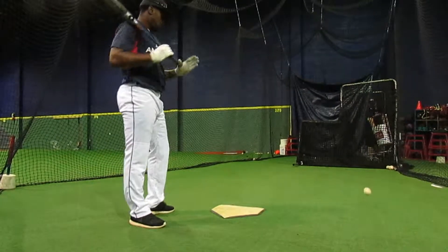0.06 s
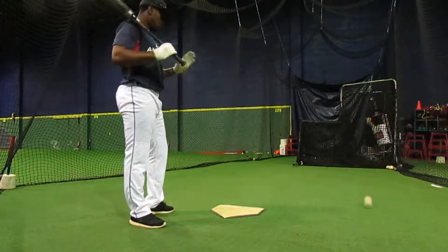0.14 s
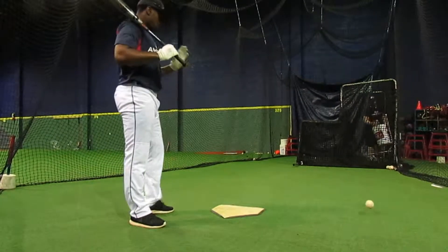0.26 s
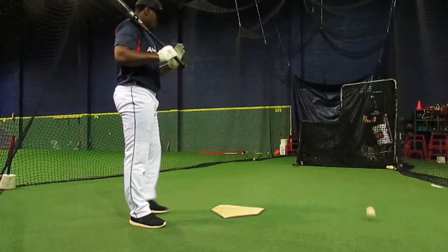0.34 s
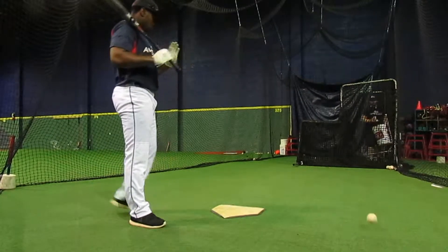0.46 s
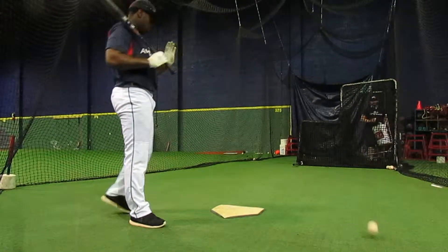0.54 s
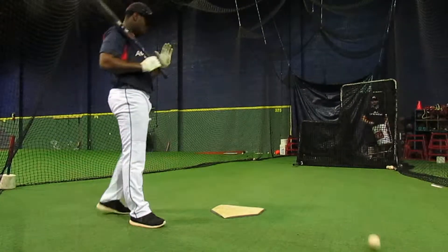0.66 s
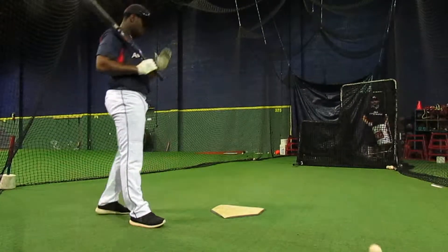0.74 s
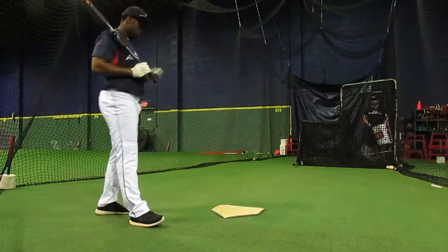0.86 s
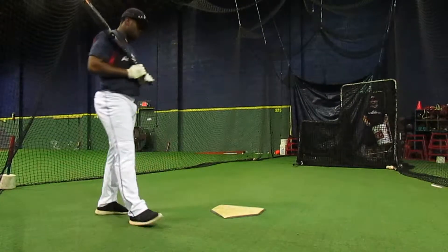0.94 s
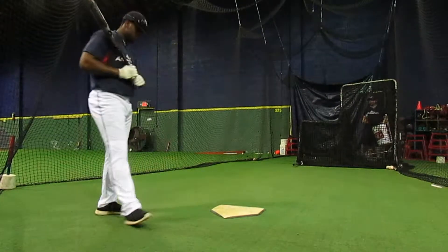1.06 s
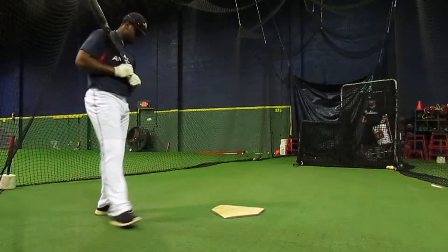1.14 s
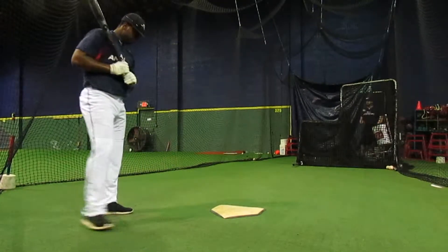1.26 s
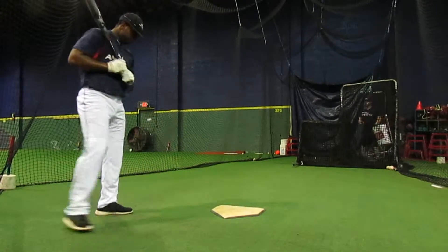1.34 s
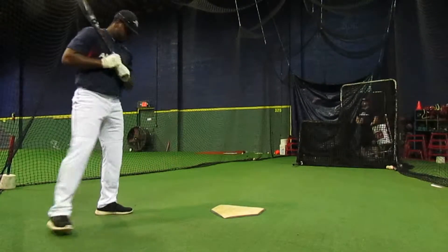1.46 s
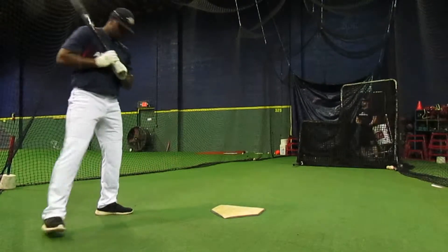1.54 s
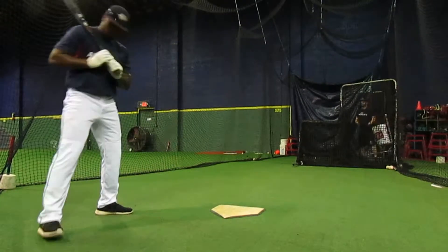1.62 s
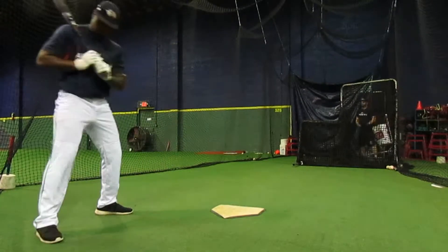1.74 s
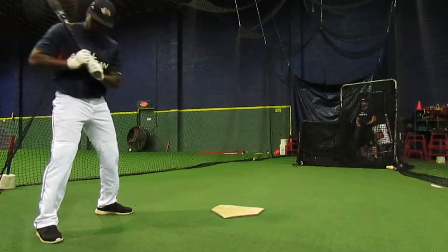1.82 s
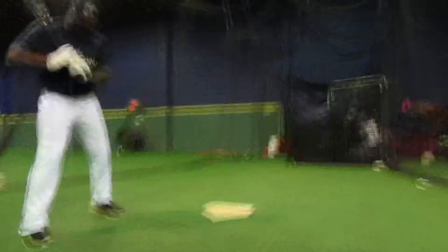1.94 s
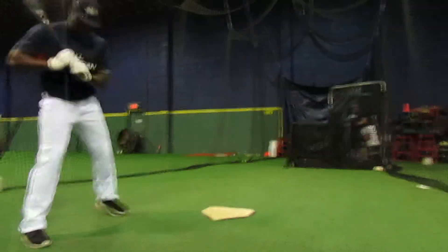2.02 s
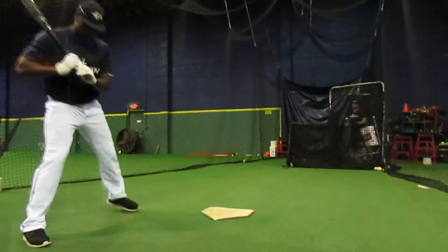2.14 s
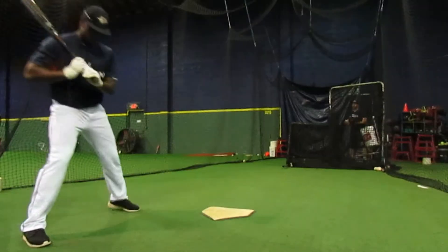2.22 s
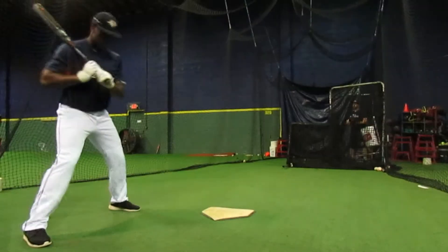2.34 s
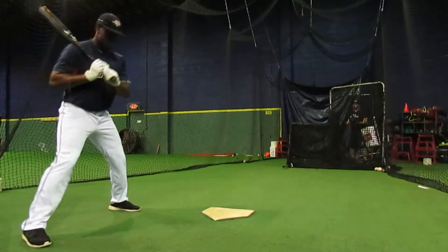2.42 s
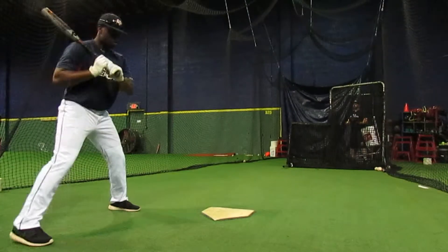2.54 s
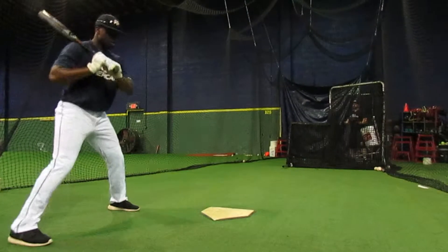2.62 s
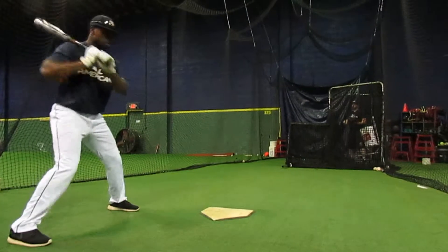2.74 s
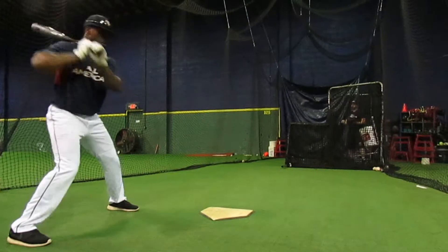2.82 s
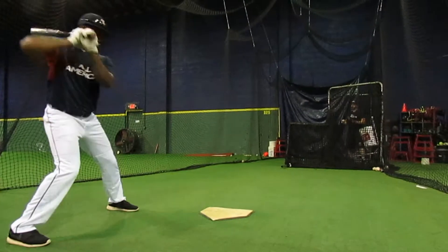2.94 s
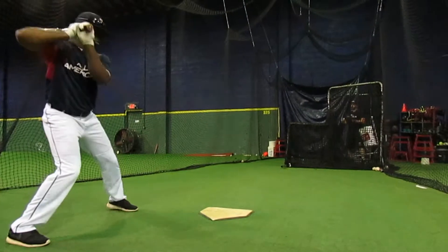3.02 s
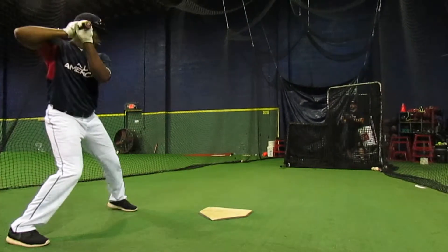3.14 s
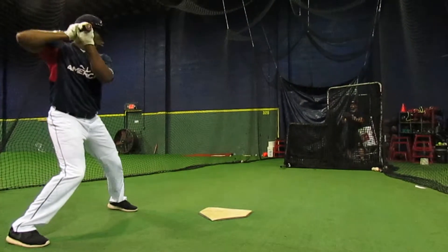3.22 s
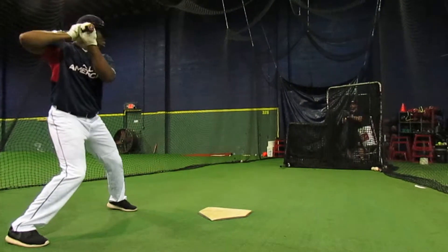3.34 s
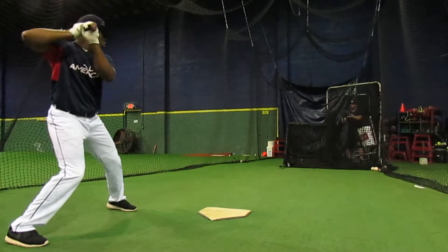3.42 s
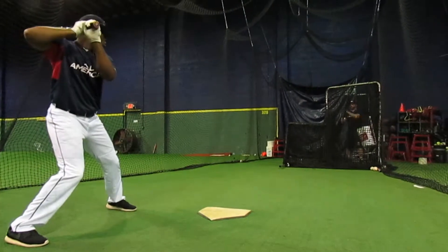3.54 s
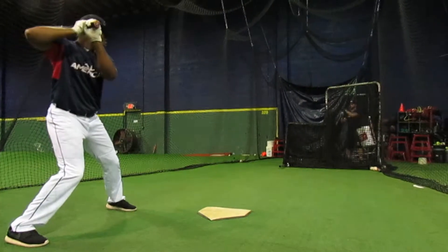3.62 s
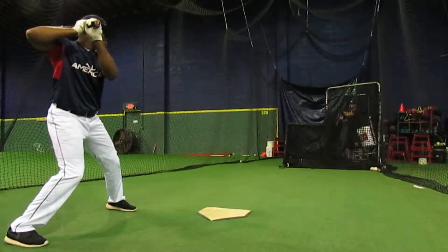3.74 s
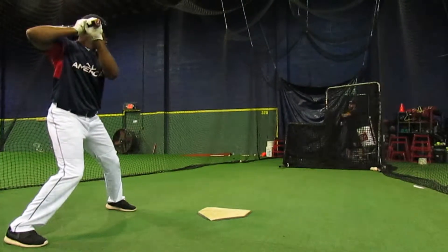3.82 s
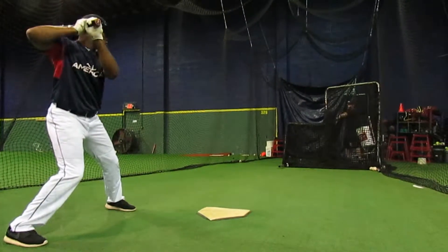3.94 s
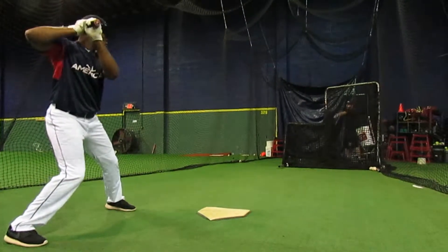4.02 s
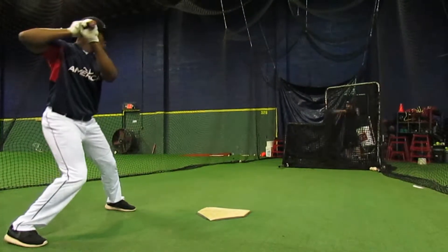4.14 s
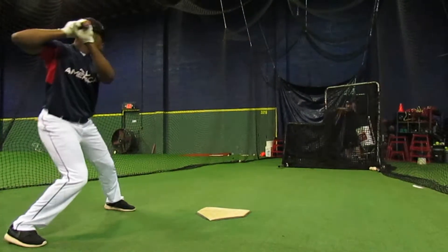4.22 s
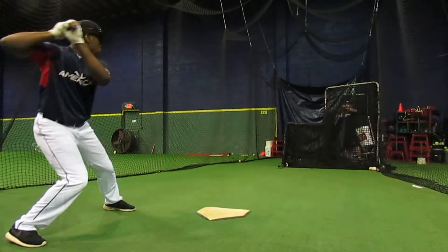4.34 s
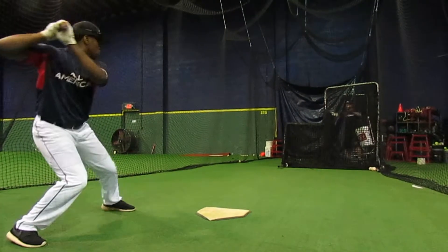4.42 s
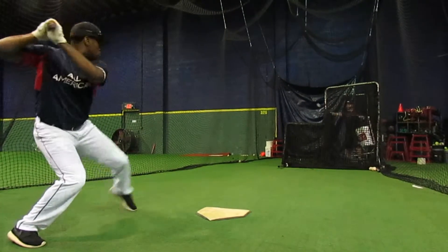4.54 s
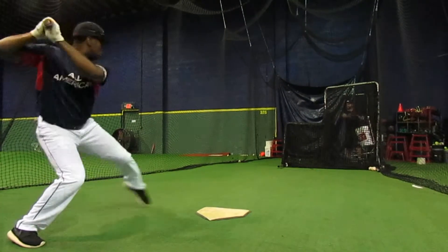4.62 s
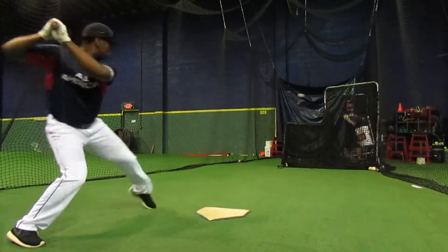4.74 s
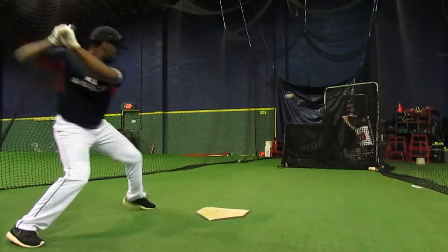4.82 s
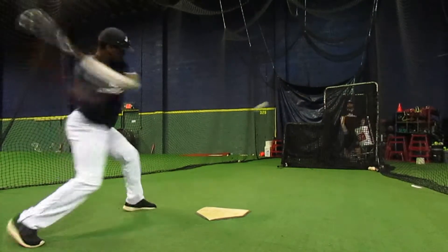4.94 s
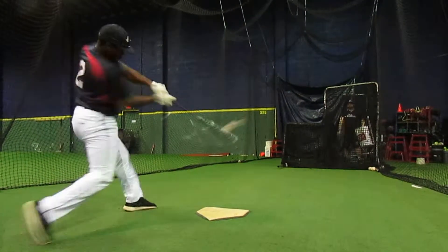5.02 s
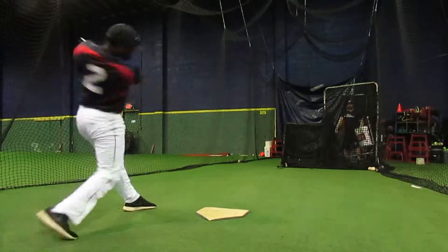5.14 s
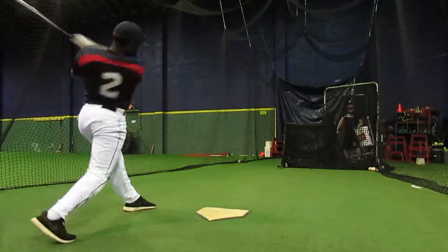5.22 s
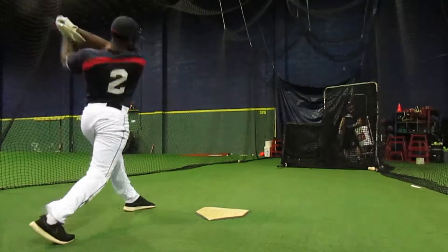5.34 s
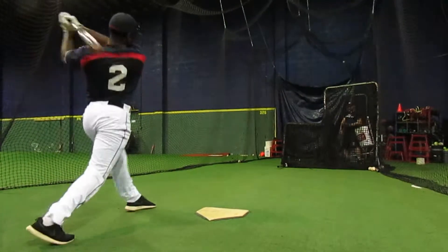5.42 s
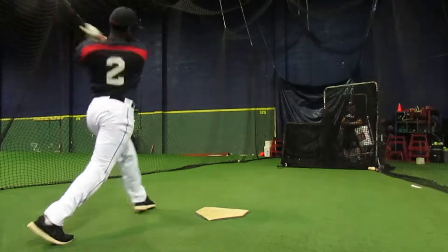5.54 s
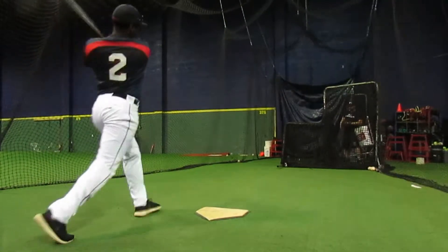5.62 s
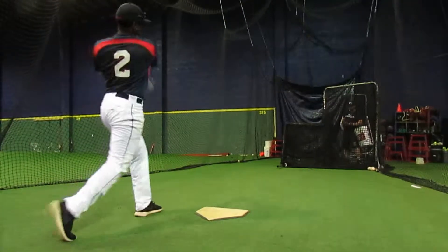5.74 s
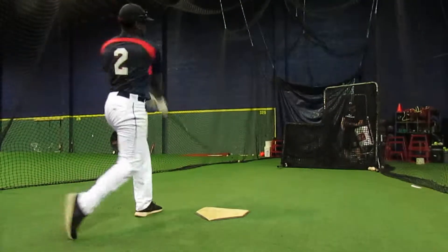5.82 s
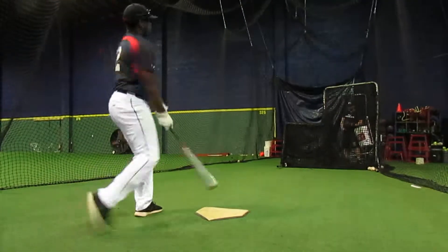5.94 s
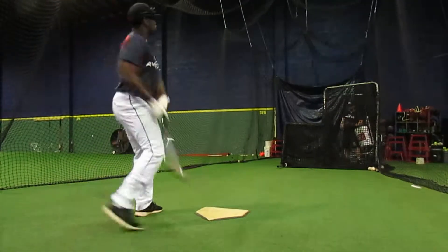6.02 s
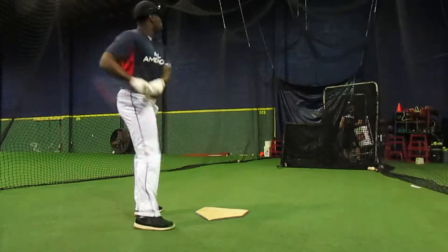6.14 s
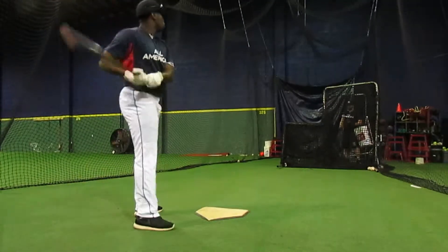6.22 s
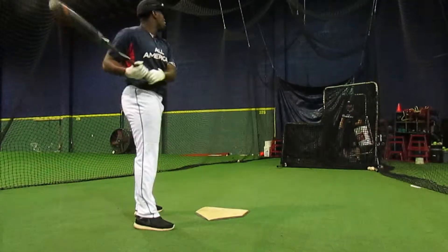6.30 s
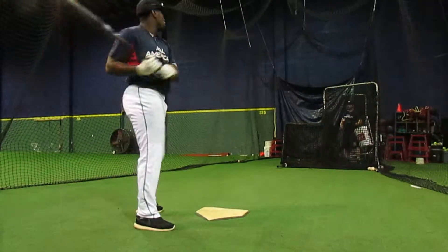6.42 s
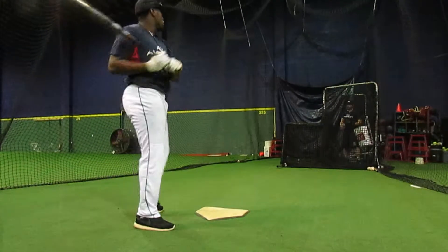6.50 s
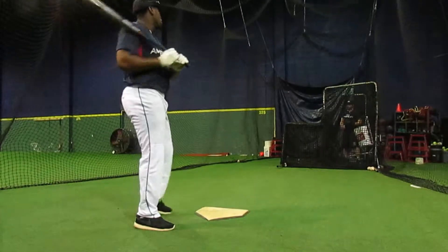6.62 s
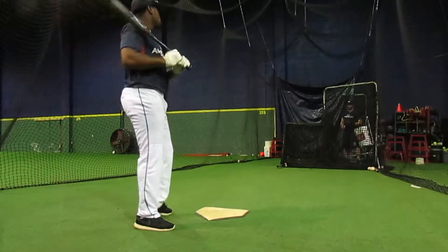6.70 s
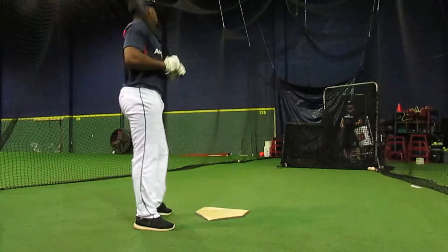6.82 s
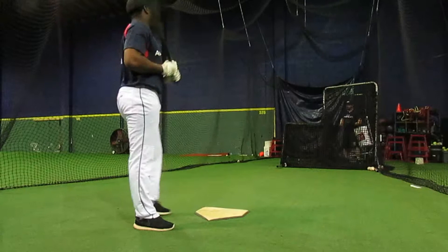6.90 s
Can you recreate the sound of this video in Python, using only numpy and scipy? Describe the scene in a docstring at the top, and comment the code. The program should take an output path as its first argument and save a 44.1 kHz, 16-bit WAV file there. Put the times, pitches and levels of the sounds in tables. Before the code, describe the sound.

Inside a large, hard-walled batting hall, mains hum and soft ventilation run throughout. A ball rolls closer and jolts a nearby stand with a hollow knock and brief rattle. Shoes and clothes rustle faintly through a quiet wait. A bat swishes and cracks a ball very loudly; the hall rings, the background dips, and a quick group of dull thuds follows. Stereo microphones stand close to the floor action.

```python
"""Indoor batting practice

A stray ball rolls up and jolts the stand; a batter's shoes and clothes rustle, the bat swishes and
cracks a ball into the netting, the hall rings, and a thud echoes closely over hum and ventilation.
Impacts are damped modes and noise bursts, the hall is noise fading band by band, movement is shaped
noise, the hum is wavering sines. Gain control ducks after loud hits and recovers; peaks may clip."""
import sys
import numpy as np
from scipy import signal
from scipy.fft import rfft, irfft, next_fast_len
from scipy.io import wavfile
from scipy.ndimage import uniform_filter1d

SR = 44100
rng = np.random.default_rng(int(sys.argv[2]) if len(sys.argv) > 2 else 0)


def wav_record(signal):
    """Record a signal, one row per channel, as 16-bit PCM in the file named by sys.argv[1]."""
    frames = np.transpose(np.atleast_2d(signal))
    bounded = np.clip(frames, -1, 1)
    # unit amplitude maps onto the largest positive 16-bit level
    quanta = np.round(bounded * 32767).astype(np.int16)
    wavfile.write(sys.argv[1], SR, quanta)


N = 307377
TIME = np.arange(N) / SR  # seconds

# Spectrum tables give relative colour; noise() sets the rms level.
# bat and ball modes: pitch_hz, level_db, t60_s
BAT_MODES = [(942,6,0.0096),(1674,5,0.012),(1980,2,.007),(2931,-1.5,.042),(3334,-13,0.094),(4234,-2.5,0.0089),(4940,-5.5,0.012),(6070,-12,.01),(6520,-18.5,0.011),(10600,-9,0.0061)]
# low shove of air at contact: pitch_hz, level_db, t60_s
AIR_PUSH = [(70,-25,.025)]
# instant of contact, spectrum: freq_hz, density_db (per Hz)
SNAP_SPECTRUM = [(300,-16.5),(2000,3.5),(8000,-3),(15000,-3.5)]
# the crack as the hall returns it, spectrum: freq_hz, density_db (per Hz)
CRACK_HALL_SPECTRUM = [(47, -36.5), (80, -17), (138, -18.5), (273, -5.5), (371, -11), (526, 0), (600, -4.5),
                       (780, 0.5), (1290, -1), (1540, 2.5), (2550, -7), (3030, -3), (3940, -13),
                       (6970, -17), (15000, -40.5)]
# the bat's ring in the hall, spectrum: freq_hz, density_db (per Hz)
PING_SPECTRUM = [(2500,-42.5),(2830,-14),(2960,-3),(3130,-6),(3330,-3.5),(3520,-5),(3900,-48)]
# bright early reflections, spectrum: freq_hz, density_db (per Hz)
SIZZLE_SPECTRUM = [(2000,-22),(5000,1),(9000,1),(15000,-16.5)]
# hall decay before each layer's t60_share: freq_hz, t60_s
HALL_DECAY = [(120,4),(300,4.26),(700,3.22),(1500,2.63),(3100,2.09),(5000,1.7),(8000,1.23),(14000,1)]
# distinct wall echoes of the crack: start_s, level_db
WALL_ECHOES = [(5.0884,-8.5),(5.1418,-11.5),(5.167,-40),(5.297,-18.5)]
# colour of those echoes: freq_hz, density_db (per Hz)
ECHO_SPECTRUM = [(100,-27),(250,3),(500,-7.5),(900,5),(1700,-1),(2600,-16),(6000,-20.5),(15000,-37)]
# small metal net fittings: pitch_hz, level_db, t60_s
FITTING_MODES = [(6982,-3.5,0.71),(9570,-1.5,0.49),(11165,-8.5,0.55),(12452,3.5,0.36),(13426,-1,0.35)]
CONTACT_S = 5.0429  # the bat meets the ball

# thuds of a ball and their close echoes: start_s, direct_db, pitch_factor, hall_db, slap_db
BALL_THUDS = [(0.612,-30.5,0.52,-47,-56),(6.2642,-9.5,0.91,-27,-42),(6.2895,-11,1.23,-35.5,-23.5),(6.3332,-13.5,1.01,-39,-57),(6.433,-23,0.95,-54,-66.5)]
# thud modes before pitch_factor: pitch_hz, level_db, t60_s
THUD_MODES = [(190,-18,0.079),(347,-11,0.0042),(565,-1,0.018),(865,-32,0.0042)]
# dull noise of a thud, spectrum: freq_hz, density_db (per Hz)
THUD_SPECTRUM = [(29, -51), (50, -22), (221, -2.5), (330, -5), (397, 0.5), (427, -1), (663, -0.5),
                 (1030, -15), (1720, -25.5), (2480, -34), (4000, -31), (5200, -58), (8800, -120)]
# slap and netting, spectrum: freq_hz, density_db (per Hz)
SLAP_SPECTRUM = [(150,-13.5),(700,12),(1600,7.5),(2500,-13),(3600,-9),(6000,-12.5),(11000,-17.5),(15000,-31.5)]
# netting rustle after the stray ball lands: peak_s, level_db, rise_s, hold_s, fall_s
NET_RUSTLE = (.635,-51.5,.08,.05,1.0)

# soles twisting on the turf: peak_s, level_db, rise_s
SOLE_TWISTS = [(4.941,-32.5,.07),(4.996,-39,.14)]
# stick-slip partials of a sole: multiple (of the slip rate), level_db
SOLE_PARTIALS = [(1,-7),(2,-1),(3,-9),(4,-22.5)]
# slip rate at the twist's peak, and the share of it lost each second
SLIP_HZ, SLIP_SAG_PER_S, TWIST_FALL_S = 196.5, .8, 0.07
# swish of the bat, greatest at contact
SWING_DB, SWING_RISE_S, SWING_FALL_S = -34.5, 0.2, 0.041
# air rushing round the bat, spectrum: freq_hz, density_db (per Hz)
SWISH_SPECTRUM = [(80,-17),(220,-2.5),(600,-1.5),(1400,-3.5),(2500,-15.5),(7000,-27.5),(15000,-31)]
# a shoe dragged over the turf: peak_s, level_db, rise_s, hold_s, fall_s
SHOE_DRAG = (1.262,-43.5,.33,.085,.62)
# shoe on turf, spectrum: freq_hz, density_db (per Hz)
TURF_SPECTRUM = [(100,-27),(230,-3),(550,6.5),(800,-11),(1500,-6.5),(2400,-24),(3400,-9.5),(4400,-21),(5800,-13.5),(6800,-10.5),(8000,-15.5),(11000,-16.5),(15500,-20)]
# low rumbles, weight on the floor and the hall's rumble after the crack:
# peak_s, level_db, rise_s, hold_s, fall_s
LOW_RUMBLES = [(.03,-59.5,1.0,0.11,1.3),(2.407,-55,1.5,.04,.8),(3.3,-65,0.89,.12,1.1),(4.5,-73.5,1.5,.3,1.0),(5.451,-48,1.4,0.68,3.2)]
# clothes and gloves rustling: peak_s, level_db, rise_s, hold_s, fall_s
CLOTHES_RUSTLES = [(0.023,-60.5,1.1,0.15,1.3),(3.3,-66,1.34,.12,1.0),(4.422,-59.5,1.0,.1,1.2),(4.93,-50,0.38,.005,.28),(5.04,-37,0.16,0.29,2.5),(5.83,-48,0.276,0.055,.6),(5.953,-39.5,.12,.01,1.1),(6.308,-45,0.39,.01,0.44),(6.602,-50,0.26,0.0097,.4)]
# clothes, spectrum: freq_hz, density_db (per Hz)
SCUFF_SPECTRUM = [(100,-30.5),(250,4),(550,-3.5),(1500,-10),(2400,-14.5),(3400,-15),(7000,-18),(11000,-25.5),(15500,-39)]

# ball jolting the stand: start_s, level_db, rattle_db
STAND_BUMPS = [(1.9106,-18,-44),(1.9121,-12.5,-19.5),(1.917,-6.5,-18.5),(1.9216,-18.5,-15)]
# stand modes: pitch_hz, level_db, t60_s
STAND_MODES = [(123,-10.5,0.096),(227,1.5,0.051),(359.3,-14,0.21),(511,-9,0.04),(720,-9,0.02),(960,-18,0.052),(1710,-19,0.052)]
# loose parts of the stand, spectrum: freq_hz, density_db (per Hz)
RATTLE_SPECTRUM = [(710, -41), (1200, 4.5), (1650, -5), (4980, -23.5), (5910, -14.5), (9170, -15.5),
                   (9990, -9.5), (11100, -25), (15500, -31)]
# the jolt's short echo from the cage, spectrum: freq_hz, density_db (per Hz)
CAGE_SPECTRUM = [(80,-16),(250,1.5),(420,7),(700,-18),(1700,-15),(3000,-28),(9000,-32.5),(15000,-50)]
# rolling ball and low rumbles, spectrum: freq_hz, density_db (per Hz)
RUMBLE_SPECTRUM = [(15,-34),(30,-19.5),(60,0),(85,3.5),(170,-3.5),(300,-9),(600,-17.5),(1500,-17.5),(4000,-39.5)]
# the ball rolls at a steady speed to the stand, STAND_M from the listening point
ROLL_START_S, ROLL_END_S, ROLL_M_PER_S, STAND_M = 0.59, 1.935, 1.65, 1.6
ROLL_RISE_S, ROLL_T60_S = 0.4, 1.6
ROLL_DB, SEAM_DB = -49.5, -47.5  # levels at the stand, quieter farther off
SEAM_START_S, TURN_S, SEAM_GAP_S = 1.516, .1425, .086  # two seam ticks per turn

# light ticks of shoes and gloves: start_s, level_db
SMALL_TICKS = [(0.1752,-49.5),(0.3872,-51),(.5811,-52),(.8261,-54.5),(0.944,-50.5),(1.1383,-54),(2.2628,-52),(2.5384,-51),(6.567,-47)]
# dry tick, spectrum: freq_hz, density_db (per Hz)
TICK_SPECTRUM = [(500,-22.5),(1800,3),(3200,5.5),(5000,-5),(9000,-15),(15000,-35.5)]
# faint pips: start_s, level_db
FAINT_PIPS = [(1.0886,-50),(1.4092,-46.5),(1.5687,-47.5),(1.6523,-46),(2.3285,-45.5),(2.896,-51.5),(3.049,-47),(3.204,-50.5),(3.6496,-46.5),(3.8895,-48),(4.0522,-53),(4.4922,-49)]
# modes of a pip: pitch_hz, level_db, t60_s
PIP_MODES = [(1677,-0.5,0.035),(1633,-12,0.027)]

# mains hum lines before the shared lift: pitch_hz, level_db (rms)
HUM_LINES = [(360.7, -55), (479.1, -62), (597.5, -63.5), (721.4, -62.5), (958.2, -70.5), (1082, -73),
             (1200, -70), (1319, -68), (1443, -73), (1680, -77.5), (1922, -74.5), (2040, -76.5),
             (2159, -80.5), (2283, -82.5), (2998, -77), (3720, -79.5), (4199, -83), (4560, -94),
             (5039, -90), (5459, -82.5), (5518, -81), (5760, -78)]
HUM_LIFT_DB = 2.0
# hum between the microphones: freq_hz, balance_db (left minus right)
HUM_BALANCE = [(60, 0.0), (110, 0.0), (200, 1.5), (380, 1), (700, 0.5), (1290, -6), (2380, 1), (4400, -0.5),
               (8120, -1.5), (15000, -1.5)]
# hum between the microphones: freq_hz, phase_rad (left leads)
HUM_LEAD = [(360,-0.11),(600,-0.53),(1200,-1.95),(1640,0.57),(2580,1),(3600,0.897),(7000,-0.31)]
# ventilation, spectrum: freq_hz, density_db (per Hz)
AIR_SPECTRUM = [(15,-60.5),(35,-38.5),(70,-22.5),(130,-15.5),(260,-11.5),(450,-12.5),(800,-13.5),(1350,-19.5),(1750,-18.5),(2500,-25.5),(4800,-29),(7500,-31),(11000,-33.5),(15500,-41.5)]
AIR_DB = -57.5  # ventilation level, before its slow drift

# diffuse sound at the two microphones: freq_hz, likeness (clipped to -1..1)
MIC_LIKENESS = [(100,6.5),(230,2.5),(400,0.9),(640,0.57),(1400,0.14),(3100,1),(7000,.9),(15000,0.2)]
# diffuse sound at the two microphones: freq_hz, balance_db (left minus right)
MIC_BALANCE = [(60,-3),(110,-1.5),(200,-2.5),(380,4),(700,-2.0),(1290,-9.5),(2380,-3),(4400,-1.0),(8120,-1),(15000,-2)]
# diffuse sound at the two microphones: freq_hz, phase_rad (left leads)
MIC_LEAD = [(100,-0.45),(400,-0.03),(860,-0.5),(1200,-1.5),(1550,-0.055),(2150,1),(4100,0.14),(12000,-0.077)]
EDGE_HZ = 15900  # top of the output band


def crack():
    """The blow sets bat modes ringing and pushes air; hall, walls and net fittings answer."""
    out, s = np.zeros((2, N)), CONTACT_S
    bat = ring(BAT_MODES[1::2]) - ring(BAT_MODES[::2])  # neighbouring modes swing in opposite directions
    add(out, s, low_cut(bat, hz=350) * amp([[-1.5], [2]]))  # louder on the right
    add(out, s, ring(AIR_PUSH))
    add(out, s, amp(8.0) * burst(SNAP_SPECTRUM, t60=0.0036))
    add(out, s, amp(-32.5) * burst(SLAP_SPECTRUM, t60=0.14))  # scatter off turf and netting close by
    add(out, s, amp(-14.5) * hall(CRACK_HALL_SPECTRUM, gap=0.019, rise=0.038, t60_share=1.0))
    add(out, s, amp(-20.5) * hall(PING_SPECTRUM, gap=0.0058, rise=0.044, t60_share=0.89))
    add(out, s, amp(-22.0) * hall(SIZZLE_SPECTRUM, gap=0.021, rise=.015, t60_share=0.35))
    for echo_s, db in WALL_ECHOES:
        add(out, echo_s, amp(db) * burst(ECHO_SPECTRUM, t60=0.065))
    fade_in = np.minimum(TIME[:SR] / .015, 1)
    add(out, 5.495, amp(-45.5) * ring(FITTING_MODES) * fade_in)
    return out


def thuds():
    """Each thud or echo is damped modes and a noisy slap, with a boom in the hall; netting rustles."""
    out = noise(SLAP_SPECTRUM, size=N) * swell(*NET_RUSTLE) * grit(depth_db=3.5)
    for s, db, pitch, hall_db, slap_db in BALL_THUDS:
        modes = [(hz * pitch, mode_db, t60) for hz, mode_db, t60 in THUD_MODES]
        thud = -amp(db) * ring(modes)
        pair = np.array([np.roll(thud, 8), thud])  # left lags by 8 samples
        add(out, s, low_cut(pair, hz=130))
        add(out, s, amp(db - 12) * burst(THUD_SPECTRUM, t60=0.073))
        add(out, s, amp(slap_db) * burst(SLAP_SPECTRUM, t60=0.039))
        add(out, s, amp(hall_db) * hall(THUD_SPECTRUM, gap=0.022, rise=0.0067, t60_share=0.47))
    return out


def batter():
    """A dragged shoe and clothes are shaped, gritty noise; soles stick and slip, and the bat swishes."""
    drag = noise(TURF_SPECTRUM, size=N) * swell(*SHOE_DRAG) * grit(depth_db=1.8)
    rustles = sum(swell(*row) for row in CLOTHES_RUSTLES)
    clothes = noise(SCUFF_SPECTRUM, size=N) * rustles * grit(depth_db=2.0)
    soles = sum(twist(*row) for row in SOLE_TWISTS)
    return drag + clothes + swish() + soles


def swish():
    """Air noise grows as the bat speeds up, then dies quickly after contact."""
    envelope = swell(CONTACT_S, SWING_DB, SWING_RISE_S, 0, SWING_FALL_S)
    return noise(SWISH_SPECTRUM, size=N) * envelope


def twist(s, db, rise):
    """A turning sole sticks and slips at a steadily slowing rate, as a set of harmonics."""
    slip_hz = SLIP_HZ * (1 - SLIP_SAG_PER_S * (TIME - s))
    turns = np.cumsum(slip_hz) / SR
    slips = sum(amp(partial_db) * np.cos(2 * np.pi * round(k) * turns) for k, partial_db in SOLE_PARTIALS)
    return evened(slips) * swell(s, db, rise, 0, TWIST_FALL_S)


def low_rumbles():
    """Low noise swells for weight on the floor and for the hall's rumble after the crack."""
    swells = sum(swell(*row) for row in LOW_RUMBLES)
    return noise(RUMBLE_SPECTRUM, size=N) * swells


def stray_ball():
    """A rolling ball jolts the stand's modes; its loose parts rattle and the cage answers shortly."""
    out = rolling()
    for s, db, rattle_db in STAND_BUMPS:
        add(out, s, -amp(db) * low_cut(ring(STAND_MODES), 54))
        add(out, s, amp(rattle_db) * burst(RATTLE_SPECTRUM, t60=0.025))
    add(out, 1.94, amp(-31.5) * burst(CAGE_SPECTRUM, t60=0.22))
    return out


def rolling(count=3):
    """Low noise grows as the ball nears; its seam ticks twice a turn through the last few turns."""
    settled = np.clip((TIME - ROLL_START_S) / ROLL_RISE_S, 0, 1)
    stopped = amp(-60 * np.maximum(TIME - ROLL_END_S, 0) / ROLL_T60_S)
    rumble = amp(ROLL_DB) * noise(RUMBLE_SPECTRUM, size=N)
    out = rumble * nearness(TIME) * settled * stopped
    for turn_s in SEAM_START_S + TURN_S * np.arange(count):
        for s in (turn_s, turn_s + SEAM_GAP_S):
            add(out, s, amp(SEAM_DB) * nearness(s) * burst(TICK_SPECTRUM, t60=0.071))
    return out


def nearness(s):
    """Gain of the rolling ball at time s: one over its distance, 1 at the stand."""
    to_go_m = ROLL_M_PER_S * np.maximum(ROLL_END_S - s, 0)
    return STAND_M / (STAND_M + to_go_m)


def small_sounds():
    """Dry ticks are noise bursts, and faint pips are pairs of damped modes."""
    out = np.zeros((2, N))
    for s, db in SMALL_TICKS:
        add(out, s, amp(db) * burst(TICK_SPECTRUM, t60=0.041))
    for s, db in FAINT_PIPS:
        add(out, s, amp(db) * ring(PIP_MODES))
    return out


def background():
    """Hum lines waver in level and phase over the ventilation's rush of noise."""
    out = noise(AIR_SPECTRUM, size=N) * amp(AIR_DB + .5 * drift(6.5))
    side = np.array([[.5], [-.5]])  # left, right
    for hz, db in HUM_LINES:
        turns = hz * TIME + 0.025 * drift(6.6) + rng.random()
        tone = np.sqrt(2) * np.sin(2 * np.pi * turns + side * read(HUM_LEAD, hz))
        level = amp(db + HUM_LIFT_DB + 0.56 * drift(7))
        out += tone * level * amp(side * read(HUM_BALANCE, hz))
    return out


def ring(modes):
    """Damped modes set off by one blow."""
    t = TIME[:SR]
    return sum(amp(db - 60 * t / t60) * np.sin(2 * np.pi * hz * t) for hz, db, t60 in modes)


def burst(spectrum, t60):
    """A short puff of coloured noise with a sudden start and a set energy."""
    t = TIME[:SR // 5]
    shape = amp(-60 * t / t60) * (1 - np.exp(-t / .0003))
    return evened(noise(spectrum, size=len(t)) * shape) * np.sqrt(np.mean(shape ** 2))


def hall(spectrum, gap, rise, t60_share):
    """Reverberation: noise that starts after a gap, builds up, and dies at its own rate in each band."""
    size = 2 * SR
    hz, t, bands = signal.stft(noise(spectrum, size=size), SR, nperseg=512)
    t60 = t60_share * read(HALL_DECAY, hz)[:, None]
    tail = signal.istft(bands * amp(-60 * t / t60), SR)[1][:, :size]
    return tail * np.clip((TIME[:size] - gap) / rise, 0, 1)


def noise(spectrum, size):
    """Coloured noise of rms 1, partly shared by the two microphones."""
    length = next_fast_len(size, True)
    hz = np.fft.rfftfreq(length, 1 / SR)
    a, b = rfft(rng.standard_normal((2, length)))
    same = np.clip(read(MIC_LIKENESS, hz), -1, 1)
    lean = amp(read(MIC_BALANCE, hz) / 2)
    lead = np.exp(1j * read(MIC_LEAD, hz))
    left = a * lean * lead
    right = (same * a + np.sqrt(1 - same ** 2) * b) / lean
    pair = np.array([left, right]) * amp(read(spectrum, hz))
    return evened(irfft(pair, length)[:, :size])


def swell(s, db, rise, hold, fall):
    """Envelope that reaches db at time s, holds, and fades; rise and fall are the times for 60 dB."""
    below = np.maximum(s - TIME, 0) / rise + np.maximum(TIME - s - hold, 0) / fall
    return amp(db - 60 * np.minimum(below, 3))


def grit(depth_db):
    """Fibres catching and letting go: a fast, uneven gain of rms 1."""
    flicker = uniform_filter1d(rng.standard_normal(N), 90)
    return evened(amp(depth_db * evened(flicker)))


def drift(hz):
    """Slow chance of rms 1: random points at the given rate, joined by lines."""
    return evened(np.interp(TIME * hz, np.arange(400), rng.standard_normal(400)))


def low_cut(x, hz):
    """Rolls off the bass below hz."""
    return signal.sosfilt(signal.butter(2, hz, "high", fs=SR, output="sos"), x)


def amp(db):
    """Decibels to gain."""
    return np.exp(np.asarray(db) * (np.log(10) / 20))


def evened(x):
    """Scales to rms 1."""
    return x / np.sqrt(np.mean(x ** 2) + 1e-20)


def read(points, hz):
    """Reads a table on a log-frequency axis."""
    f, value = np.transpose(points)
    return np.interp(np.log(hz + 1), np.log(f + 1), value)


def add(mix, s, sound):
    """Mixes a sound in at time s, cut off at the end of the mix."""
    part = mix[:, round(s * SR):][:, :sound.shape[-1]]
    part += sound[..., :part.shape[1]]


def scene():
    """All sources at the two microphones, which lose the deepest bass."""
    hits = crack() + thuds()
    movement = batter() + low_rumbles() + stray_ball() + small_sounds()
    return low_cut(hits + movement + background(), 45)


def record(dry, start_duck_db=7, recover_db=5.0, threshold_db=-17.0, slope=0.99, attack=.008):
    """Gain control drops fast and creeps back (recover_db per second); peaks clip; treble is cut."""
    keep = np.exp(-1 / (.005 * SR))  # 5 ms power average
    power = signal.lfilter([1 - keep], [1, -keep], (dry ** 2).mean(0))
    power_db = 10 * np.log10(power + 1e-12)
    over_db = np.maximum(slope * (power_db - threshold_db), 0)
    recovery = recover_db * TIME
    # hold the deepest duck so far, less what has been recovered since
    duck_db = np.maximum(np.maximum.accumulate(over_db + recovery), start_duck_db) - recovery
    lag = np.exp(-1 / (attack * SR))
    duck_db = signal.lfilter([1 - lag], [1, -lag], duck_db - start_duck_db) + start_duck_db
    clipped = np.clip(dry * amp(-duck_db), -1, 1)
    band_limit = signal.firwin(511, EDGE_HZ, window=("kaiser", 9), fs=SR)
    return signal.oaconvolve(clipped, band_limit[None], "same")


dry = scene()
out = record(dry)
wav_record(out)
```